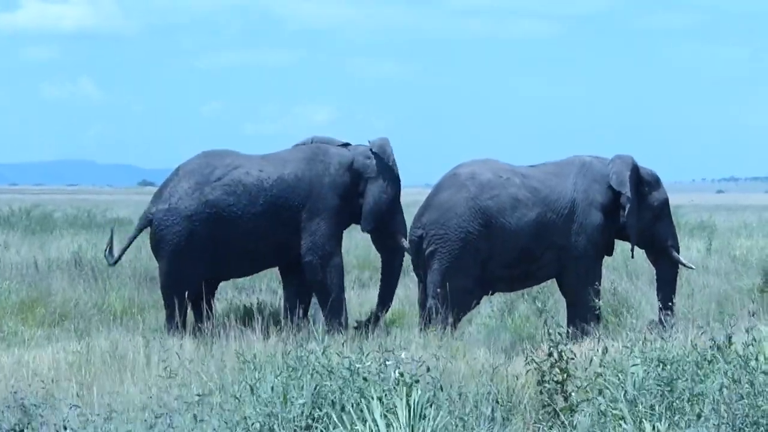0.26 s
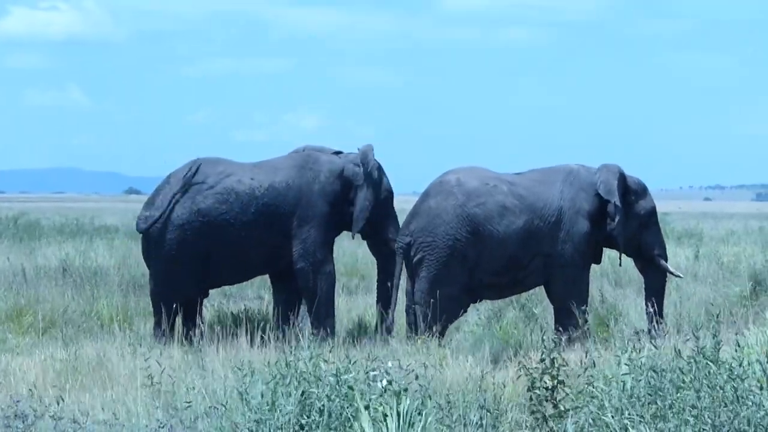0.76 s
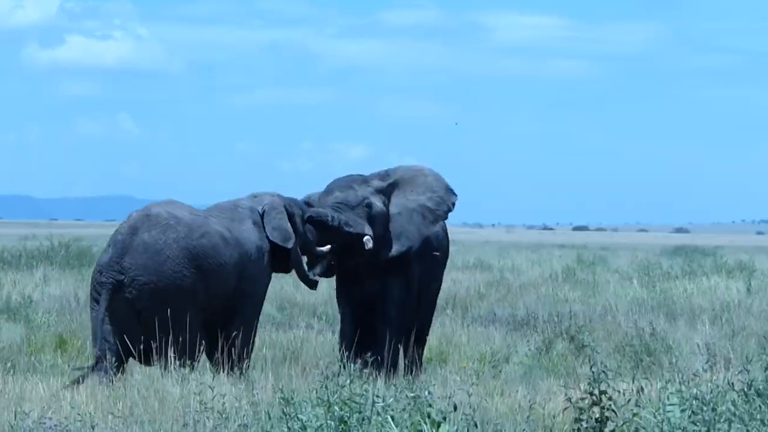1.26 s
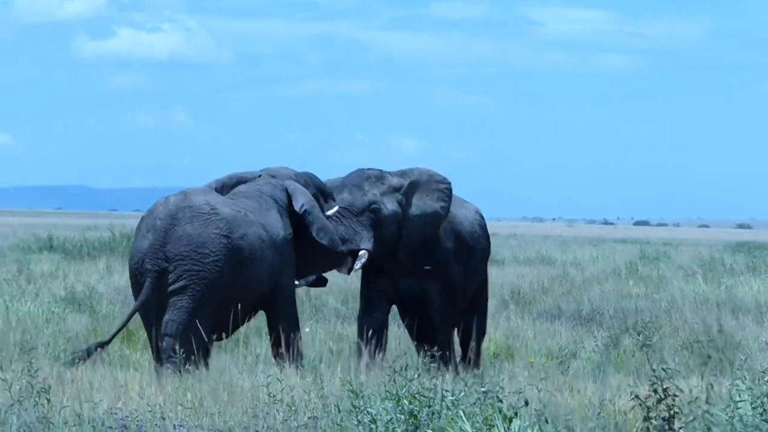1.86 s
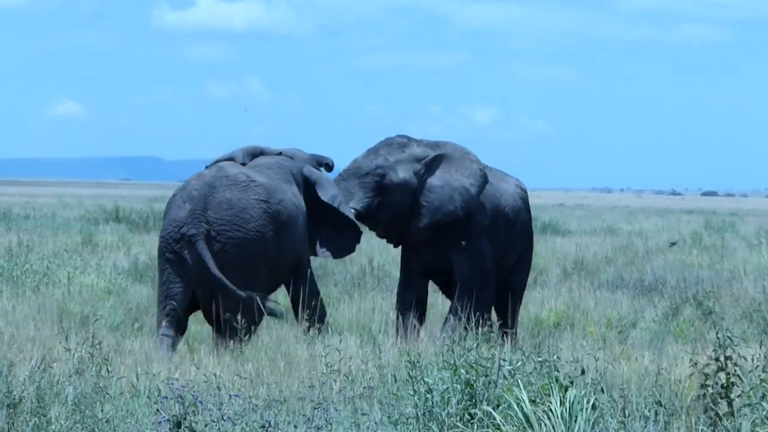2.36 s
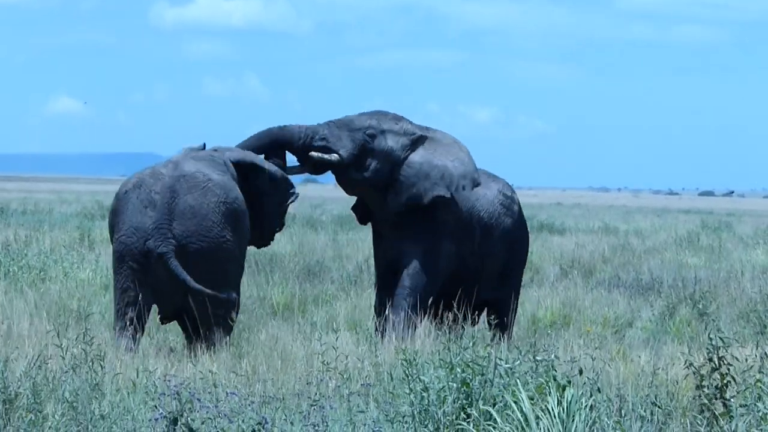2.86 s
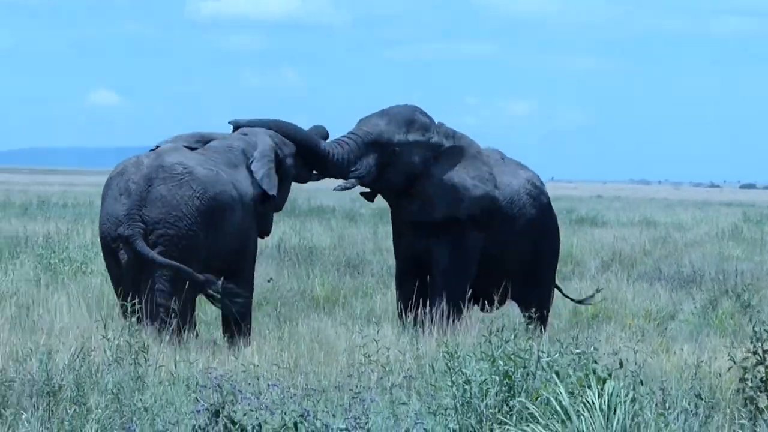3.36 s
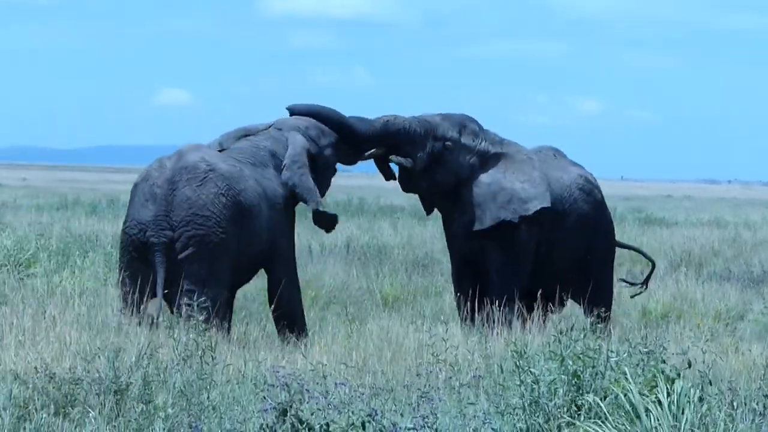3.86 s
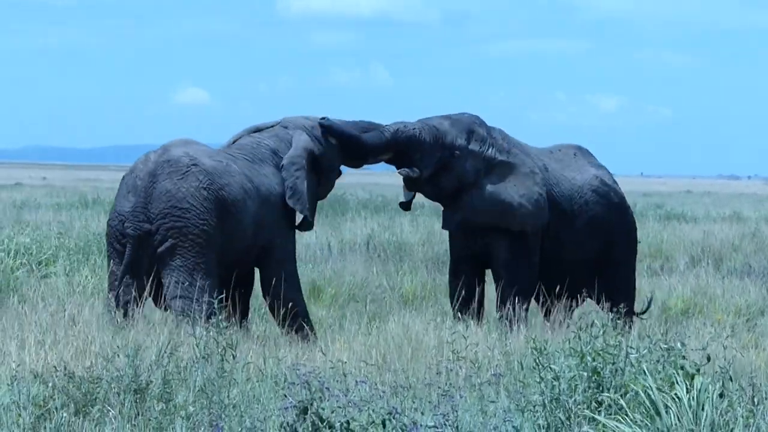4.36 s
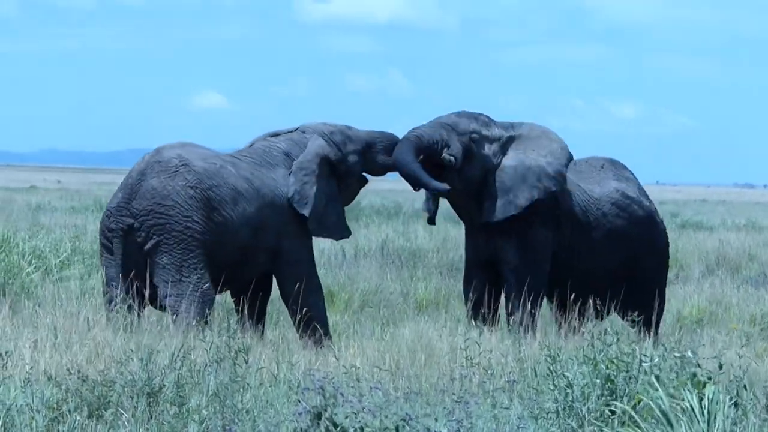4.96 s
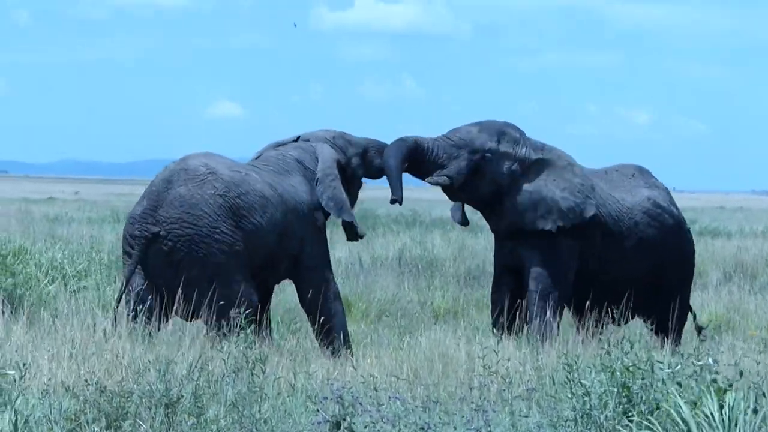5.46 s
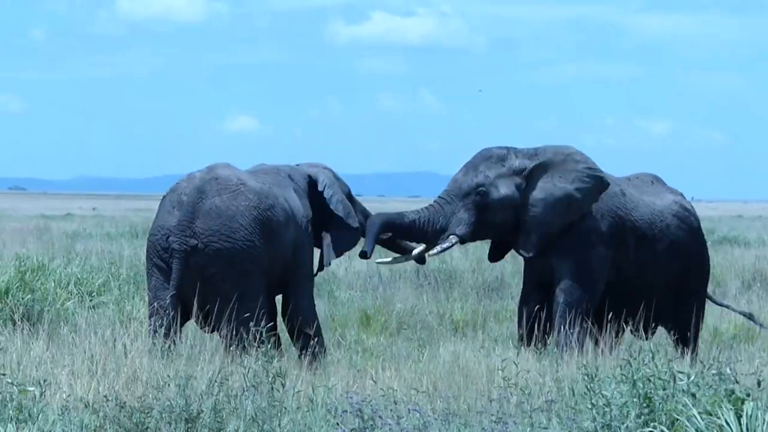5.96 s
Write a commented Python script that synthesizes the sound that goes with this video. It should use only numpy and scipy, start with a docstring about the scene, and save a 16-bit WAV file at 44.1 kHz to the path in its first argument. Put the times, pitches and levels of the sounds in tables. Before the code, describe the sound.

A small camera zoom motor ratchets loudly in four short bursts close up, over faint windy grassland hiss with little handling knocks.

```python
"""A small camera drive close to the microphone runs in four bursts, eleven turns a second. Every turn is the same
chain of gear and latch contacts: swarms of tiny impacts and blunt thuds that rattle a plastic and metal body.
Nearby are damped knocks, a squeak of gliding tones, faint noise-fed chirps, rustle and a shifting hand.
Behind lies open grassland: light wind, far murmur and hiss made of flickering noise bands.
An edit leaves a short silence early on."""
import sys
import numpy as np
from scipy import signal
from scipy.io import wavfile
from scipy.ndimage import uniform_filter1d, map_coordinates

SR = 44100
rng = np.random.default_rng(int(sys.argv[2]) if len(sys.argv) > 2 else 0)


def rack_gain(trim_db):
    """Turn a fader trim in dB into the linear factor to multiply a signal by."""
    fader = np.asarray(trim_db, float)
    return 10 ** (fader / 20)


def store_pcm(level_fs):
    """Save levels as 16-bit WAV."""
    pcm = np.round(np.clip(level_fs, -1, 1) * 32767).astype(np.int16)
    wavfile.write(sys.argv[1], SR, np.atleast_2d(pcm).T)


N = 273552  # length in samples
TURN_S = 0.09
SLIP_MS = 0.12  # spread of the timing of contacts and thuds

# bursts of the drive: start_s, turns, level_db (relative), change_db per turn (taken off when negative)
BURSTS = [(1.49, 7, 0, 0.17), (2.626, 6, -0.5, 0.33), (3.544, 10, 0, -0.2146), (4.686, 5, -0.5, -0.45)]


def drive():
    """A motor turns gears and latches; their swarms shake the upper body and their thuds ring the shell."""
    turns, ends = [], []
    for start_s, count, level_db, change_db in BURSTS:
        count = int(count)
        turns += [(start_s + k * TURN_S, level_db + k * change_db) for k in range(count)]
        ends.append((start_s + count * TURN_S, level_db + count * change_db))
    t = np.arange(N) / SR
    running = sum((t > s) & (t < s + TURN_S) for s, _ in turns)
    whirr = uniform_filter1d(1.0 * running, 200) * rng.standard_normal((2, N)) + 1e-9
    swarms = contact_force(whirr, turns, ends)
    thuds = thud_force(whirr[0], turns, ends)
    return upper_body(swarms) + shell(thuds)


# contacts in one turn: at_ms, clack_db (push before the body), rise_ms, fall_ms (both to 1/e),
# knock_db and tick_db (both relative to the clack), repeat_share (0-1, same on every turn)
CONTACTS = [(0.996, -12.5, 0.58, 2.37, -1.5, 4, 0.86), (5.94, -28.5, 0.67, 2.7, 1, -6, 0.58),
            (14.35, -17.5, 2.5, 2.54, 2, -2, 0.62), (19.77, -25, 0.55, 3.3, 8, -12, 0.8),
            (33.5, -22.5, 0.78, 2.4, 5, 4, 0.7), (37, -11, 1.67, 1.2, -4, 2.5, 0.87),
            (39.9, -15, 0.73, 3.3, -9.5, 1.5, 0.66), (51.05, -19.5, 1.6, 3.8, -1.5, -2.5, 0.2),
            (55.0, -26.5, 0.55, 6.1, 2.5, -8, 0.8), (59.74, -10, 0.87, 1.7, -7, -5, 0.5),
            (63, -9.5, 1.3, 4.65, -4, 1.5, 0.34), (68.6, -18, 1.5, 5.8, -0.5, 0, 0.8),
            (80.4, -26, .6, 2.7, 5, -6, 0.4), (89.5, -20.5, 1.2, 2, -5, -3, 0.8)]
# contacts as the drive parks after its last turn: same columns
PARKING_CONTACTS = [(0.5, -23.5, .8, 2.8, 1.3, 1.5, 0.95), (5.0, -43, 2.0, 8.1, 2, -10, .5),
                    (13.5, -38, 2.0, 5.6, 0.4, 5.5, 0.76)]


def contact_force(whirr, turns, ends):
    """Motor whirr and contacts push the body, in three rows: knock, clack and tick."""
    whirr_db = -32
    force = np.ones((3, 1, 1)) * rack_gain(whirr_db) * whirr
    force = play(force, CONTACTS, *zip(*turns))
    return play(force, PARKING_CONTACTS, *zip(*ends))


def play(force, contacts, starts, levels_db):
    """Each contact is a swarm of impacts; worn parts repeat a share of the swarm on every turn."""
    uneven_db, lead = 0.93, 400  # lead: samples before the peak
    ms = (np.arange(2600) - lead) / SR * 1000
    for at_ms, clack_db, rise_ms, fall_ms, knock_db, tick_db, same in contacts:
        shape = np.exp(np.where(ms < 0, ms / rise_ms, -ms / fall_ms))
        worn = grains(shape)
        strength = rack_gain([[[knock_db]], [[0]], [[tick_db]]])
        for start_s, level_db in zip(starts, levels_db):
            slip, uneven = rng.standard_normal(2)
            i = round((start_s + (at_ms + SLIP_MS * slip) / 1000) * SR) - lead
            swarm = np.sqrt(same) * worn + np.sqrt(1 - same) * grains(shape)
            push = rack_gain(clack_db + level_db + uneven_db * uneven)
            force = add(force, i, strength * push * swarm)
    return force


def grains(shape):
    """Two rows of dense uneven micro-impacts under an envelope, holding the energy of that envelope."""
    grains_per_s = 14000
    size = (2, len(shape))
    hit = rng.random(size) < grains_per_s / SR
    uneven = rng.standard_normal(size) * rack_gain(2.0 * rng.exponential(1, size))
    swarm = shape * (hit + 0.026) * uneven  # a faint noise floor fills the gaps
    energy = np.sum(swarm ** 2, axis=1, keepdims=True)
    return swarm * np.sqrt(np.sum(shape ** 2) / energy)


# upper resonances of the body: pitch_hz, width_hz, level_db (relative)
BODY = [(2650, 90, -3.5), (3600, 70, -4), (4163, 67, 5), (5240, 200, -6.5), (6600, 370, -33),
        (7700, 330, -5), (8300, 29, -6.5), (8950, 48, -1.5), (10470, 130, -7.5), (10470, 280, -15)]
# broad colour of the body: pitch_hz, level_db (per Hz, relative)
BODY_COLOUR = [(880, -39), (1500, -9), (1610, -6), (2400, -1.5), (3180, -4), (4140, -5.5), (4570, -0.5),
               (6560, 3), (10700, -5), (15500, -20.5)]
# how alike left and right are: pitch_hz, likeness (1 same, 0 unrelated)
BODY_LIKENESS = [(1800, 0.23), (3000, 0.57), (6800, 0.83), (15000, 0.28)]
# lean to the left: pitch_hz, left_over_right_db
BODY_PAN = [(1900, 8.5), (2300, 3.5), (2700, 7), (3150, 4.5), (4400, 3), (8000, 2.5), (15000, 5.5)]


def upper_body(force):
    """The plastic and metal body answers in broad bands and in sharper resonances."""
    body_db, ring_db = 1, 2.5  # ring_db lifts the resonances only

    def row(hz):
        return force[int(hz > 3300) + int(hz > 6000)]  # knock, clack, tick

    parts = []
    # neighbours have opposite sign
    for k, (hz, sos) in enumerate(bands(1637, 15260, count=10)):
        parts.append((hz, (-1) ** k * rack_gain(at_hz(BODY_COLOUR, hz)) * signal.sosfilt(sos, row(hz))))
    for k, (hz, width_hz, db) in enumerate(BODY):
        parts.append((hz, (-1) ** k * rack_gain(db + ring_db) * resonance(row(hz), hz, width_hz)))
    stereo = sum(spread(p, at_hz(BODY_LIKENESS, hz), at_hz(BODY_PAN, hz)) for hz, p in parts)
    return rack_gain(body_db) * stereo


# blunt thuds in one turn: at_ms, lowest_mode_db, middle_modes_db, upper_modes_db (pushes before the shell)
THUDS = [(0.595, -30, -28, -15), (3.43, -19, -27, -18), (6.7, -30, -42, -15), (13.67, -41, -16.5, -18),
         (21.44, -19, -22, -14), (33.56, -14, -17, -27), (36.8, -28, -19, -14), (39.94, -18, -20.5, -17.5),
         (46.4, -23, -31.5, -13), (53.2, -25, -28, -26), (55, -20, -20.5, -20), (63.1, -17, -15.5, -8.5),
         (67.4, -37, -19.5, -12), (70.6, -16.5, -17.5, -28), (74.2, -15, -28, -22), (77.1, -24, -26, -22),
         (79.9, -30, -37, -31)]
# thuds as the drive parks: same columns
PARKING_THUDS = [(.5, -28, -24, -16), (13.5, -42, -34, -38)]


def thud_force(whirr, turns, ends):
    """Motor whirr and thuds push the shell, in three rows: lowest, middle and upper modes."""
    whirr_db = -36
    force = np.ones((3, 1)) * rack_gain(whirr_db) * whirr
    force = thump(force, THUDS, *zip(*turns))
    return thump(force, PARKING_THUDS, *zip(*ends))


def thump(force, thuds, starts, levels_db):
    """Each thud is one short blunt push, nearly the same on every turn."""
    fall_ms, uneven_db = 0.42, 0.8
    push = np.exp(-np.arange(200) / SR * 1000 / fall_ms)
    for at_ms, *group_db in thuds:
        for start_s, level_db in zip(starts, levels_db):
            slip, uneven = rng.standard_normal(2)
            i = round((start_s + (at_ms + SLIP_MS * slip) / 1000) * SR)
            force = add(force, i, rack_gain(np.c_[group_db] + level_db + uneven_db * uneven) * push)
    return force


# low modes of the shell: pitch_hz, width_hz, left_db, right_db (both relative), right_lag_ms
SHELL = [(560, 150, -7, -6.5, 0.44), (910, 110, -4.5, -9, 0.072), (1030, 90, 4, 0, 0.098),
         (1095, 80, 9, -2.5, 0.14), (1337, 140, -1, -4.5, 0.18), (1444, 130, 1, -10, 0.1),
         (1702, 37, -22, -4, 0.013)]


def shell(thuds):
    """Low modes, rung by the thuds, reach the two microphones with their own level and lag."""
    shell_db = 7.5
    out = 0
    for hz, width_hz, left_db, right_db, lag_ms in SHELL:
        group = thuds[int(hz > 750) + int(hz > 1200)]  # lowest, middle, upper
        ring = resonance(resonance(group, hz, width_hz), hz, 3.2 * width_hz)
        late = np.interp(np.arange(N) - lag_ms * SR / 1000, np.arange(N), ring)
        out = out + np.array([rack_gain(left_db) * ring, rack_gain(right_db) * late])
    return rack_gain(shell_db) * out


# knocks near the microphone: start_s, ring_db (before swell and decay), pitch_hz,
# t60_s (time to fall 60 dB), crack_db (before its filter), left_over_right_db
KNOCKS = [(0.04, -32, 205, 0.042, -70, 10), (0.4813, -19.5, 720, 0.014, -21, -1),
          (0.534, -35, 137, .08, -70, 0), (2.19, -33, 483, 0.033, -70, 3),
          (2.267, -32, 1050, 0.024, -60, 0), (2.294, -34, 1100, .025, -60, 0),
          (2.314, -37, 169, 0.05, -70, 0), (2.405, -38, 163, .08, -70, 0),
          (2.409, -31.5, 504, 0.037, -70, 10), (3.336, -38, 175, 0.098, -70, 0),
          (3.38, -31, 482, 0.037, -60, 8), (3.395, -35, 470, 0.032, -70, 6),
          (5.261, -30, 184, 0.03, -68, -6), (5.415, -39, 805, 0.022, -37, 0),
          (5.748, -32.5, 724, 0.023, -35, 0), (5.785, -37, 1600, 0.006, -29, 15),
          (5.83, -41, 2480, .01, -31, 10), (5.95, -34, 720, .03, -50, -8), (6.179, -31, 148, .04, -60, 8)]


def knocks():
    """A short bright crack, and a damped ring that swells for a moment."""
    out, t = np.zeros((2, N)), np.arange(4000) / SR
    bright = signal.butter(3, [1800, 7500], "band", fs=SR, output="sos")
    for start_s, ring_db, hz, t60_s, crack_db, pan_db in KNOCKS:
        swell = np.minimum(t / (0.19 * t60_s), 1)
        ring = rack_gain(ring_db - 60 * t / t60_s) * swell * np.sin(2 * np.pi * hz * t)
        noise = signal.sosfilt(bright, rng.standard_normal(len(t)))
        crack = rack_gain(crack_db) * noise * np.exp(-t / 0.0011)
        add(out, round(start_s * SR), (ring + crack) * pan(pan_db))
    return out


# path of the squeak: time_s, pitch_hz, level_db (before stutter and pan)
SQUEAK = [(5.868, 7580, -31), (5.876, 7570, -33), (5.89, 7460, -35), (5.897, 7100, -41)]


def squeak():
    """A rubbed surface sings for a moment, stuttering as it slips."""
    time_s, hz, db = np.transpose(SQUEAK)
    t = np.arange(N) / SR
    stutter_db = 4.0 * signal.lfilter([0.04], [1, -0.96], rng.standard_normal(N)) / 0.14
    tone = np.sin(2 * np.pi * np.cumsum(np.interp(t, time_s, hz)) / SR)
    level_db = np.interp(t, time_s, db, -120, -120) + np.minimum(stutter_db, 5)
    return rack_gain(level_db) * tone * pan(4)


# faint chirps: start_s, peak_db (rms at the top of the swell), pitch_hz, length_s
CHIRPS = [(2.538, -52, 4320, 0.035), (3.47, -49, 4270, 0.026), (4.565, -54, 5320, .02)]


def chirps():
    """Short narrow notes, a little breathy: noise through two equal resonances."""
    out = np.zeros((2, N))
    for start_s, peak_db, hz, length_s in CHIRPS:
        swell = np.hanning(round(length_s * SR))
        ringing = resonance(resonance(rng.standard_normal(3000), hz, 120), hz, 120)
        note = rms_one(ringing[-len(swell):])
        add(out, round(start_s * SR), rack_gain(peak_db) * swell * note)
    return out


# grass and cloth swish close by: middle_s, length_s, peak_db (of the sheen, before pan)
SWISHES = [(2.438, .16, -52), (3.316, 0.026, -49.5), (3.423, 0.044, -50.5), (3.532, 0.23, -45),
           (4.567, 0.067, -53.5), (5.55, 0.099, -51.5), (5.69, .08, -51), (5.72, .06, -42),
           (5.798, 0.065, -47), (5.831, 0.063, -45), (5.86, 0.11, -42.5), (5.94, 0.086, -45.5),
           (5.988, 0.066, -45), (6.057, .12, -42.5), (6.1, 0.039, -45.5), (6.147, 0.044, -51),
           (6.19, 0.051, -49.5)]


def swishes():
    """Each swish swells and fades smoothly in patchy bright noise, a little to the left."""
    swell = np.zeros(N)
    for middle_s, length_s, peak_db in SWISHES:
        i = round((middle_s - length_s / 2) * SR)
        add(swell, i, rack_gain(peak_db) * np.hanning(round(length_s * SR)))
    body = air_layer(3500, 6340, count=3, patchy_db=1.0, rate=34) * rack_gain(-4.5)
    sheen = air_layer(6360, 16300, count=5, patchy_db=4.5, rate=55)
    return swell * (body + sheen) * pan(6.5)


# a hand shifts on the body: from_s, to_s, level_db (before pan)
FUMBLES = [(2.15, 2.6, -56), (3.2, 3.53, -58)]


def fumbles():
    """Soft random bumps, each ringing a few cycles at a low pitch."""
    bumps_per_s, cycles = 250, 2.5
    t = np.arange(N) / SR
    bumps = (rng.random(N) < bumps_per_s / SR) * rng.standard_normal(N) + 1e-12
    dealt = rng.integers(0, 8, N)  # which of eight pitches each bump rings
    rings = 0
    for k, hz in enumerate(np.geomspace(160, 1150, 8)):
        once = resonance(bumps * (dealt == k), hz, hz / cycles)
        rings = rings + resonance(once, hz, hz / cycles) / np.sqrt(hz)
    busy = sum(rack_gain(db) * (t > a) * (t < b) for a, b, db in FUMBLES)
    return uniform_filter1d(busy, 900) * rms_one(rings) * pan(3)


# gusts across the microphone ports: peak_s, peak_db (before the lumps), rise_s, fall_s
GUSTS = [(0.04, -55, 0.056, 0.08), (.55, -72, 0.09, 0.13), (1.46, -46.5, 0.065, 0.092),
         (1.74, -59, 0.091, 0.11), (1.96, -44.5, 0.066, .12), (2.42, -58, .15, 0.13),
         (2.92, -58.5, 0.17, 0.26), (3.7, -54, 0.2, .3), (4.15, -60, .15, .15), (4.45, -56, .15, 0.13),
         (4.73, -44.5, 0.13, .12), (4.96, -41.5, .1, 0.18), (5.66, -47.5, .12, 0.15),
         (5.95, -50, 0.088, 0.14), (6.17, -40, 0.1, .1)]


def port_wind():
    """Lumpy low buffeting that pushes the two ports in opposite directions."""
    fall_db, calm_db = 11, -80  # fall_db is lost over each rise_s or fall_s away from the peak
    t = np.arange(N) / SR
    gusts = rack_gain(calm_db)
    for peak_s, db, rise_s, fall_s in GUSTS:
        away = np.maximum((peak_s - t) / rise_s, (t - peak_s) / fall_s)
        gusts = gusts + rack_gain(db - fall_db * away)
    puff = signal.butter(3, [90, 260], "band", fs=SR, output="sos")
    noise = rms_one(signal.sosfilt(puff, rng.standard_normal((2, N))))
    return spread(gusts * rack_gain(6.3 * drift(22)) * noise, -0.93, 0)


# open air: time_s, rumble_db, murmur_db, hiss_db, top_db (above about 8 kHz)
AIR_LEVELS = [(0.0, -57.5, -58, -53.5, -55.5), (0.4, -62, -58, -54, -54.5), (1.1, -65.5, -57, -51.5, -55.5),
              (1.41, -59.5, -52.5, -52, -59.5), (2.3, -55.5, -55, -53, -58),
              (3.3, -58.5, -54.5, -49, -53.5), (4.55, -60.5, -56, -53.5, -60.5),
              (4.9, -59, -58.5, -51, -62), (5.3, -57.5, -56.5, -54, -59), (5.6, -58.5, -54, -49, -53),
              (6.2, -60, -55, -49.5, -57)]


def open_air():
    """Soft rumble below, far murmur in the middle, hiss on top: four layers of noise bands."""
    time_s, *levels = np.transpose(AIR_LEVELS)
    rumble, murmur, hiss, top = [rack_gain(np.interp(np.arange(N) / SR, time_s, db)) for db in levels]
    return (rumble * air_layer(32.2, 379, count=6, patchy_db=3.5, rate=16)
            + murmur * air_layer(377, 2420, count=10, patchy_db=2.5, rate=30)
            + hiss * air_layer(2480, 7660, count=5, patchy_db=1.3, rate=37)
            + top * air_layer(7950, 16600, count=4, patchy_db=1.0, rate=37))


# colour of the air: pitch_hz, level_db (per Hz, relative within a layer)
AIR_COLOUR = [(30, -48), (64, -16), (184, -9.5), (300, -12.5), (466, -18.5), (713, -10.5), (925, -15.5),
              (1060, -13), (1200, -19.5), (1600, -16.5), (2100, -22), (2740, -25), (3900, -21),
              (4950, -15.5), (6300, -15), (10900, -25.5), (15500, -39)]
# how alike left and right are: pitch_hz, likeness (1 same, 0 unrelated)
AIR_LIKENESS = [(30, .3), (60, 0.76), (180, 1), (550, 0.21), (1650, 0.68), (4970, 0.97), (15000, 0.77)]


def air_layer(low_hz, high_hz, count, patchy_db, rate):
    """Bands of stereo noise, each flickering partly on its own; the mean of both sides has rms 1."""
    out, together, white = 0, drift(rate), rng.standard_normal((2, 2, N))
    for k, (hz, sos) in enumerate(bands(low_hz, high_hz, count)):
        flicker_db = patchy_db * (0.27 * together + drift(rate))
        gain = rack_gain(at_hz(AIR_COLOUR, hz) + flicker_db)
        noise = signal.sosfilt(sos, white[k % 2])  # neighbours use separate noise
        out = out + gain * spread(noise, at_hz(AIR_LIKENESS, hz), 0)
    return out / np.std(out.mean(axis=0))


def at_hz(points, hz):
    """Value of a table on a log-frequency axis."""
    table_hz, values = np.array(points).T
    return np.interp(np.log(hz), np.log(table_hz), values)


def rms_one(x):
    """Scale to unit rms."""
    return x / np.sqrt(np.mean(x ** 2) + 1e-20)


def drift(rate):
    """Slow smooth chance of spread about 1, with rate random points a second."""
    knots = rng.standard_normal(400)
    return map_coordinates(knots, [np.arange(N) / SR * rate], order=3)


def resonance(x, hz, width_hz):
    """Two-pole resonance with gain about 1 on top."""
    r = np.exp(-np.pi * width_hz / SR)
    poles = [1, -2 * r * np.cos(2 * np.pi * hz / SR), r * r]
    return signal.lfilter([(1 - r * r) / 2, 0, (r * r - 1) / 2], poles, x)


def bands(low_hz, high_hz, count):
    """Centres and band-pass filters spaced evenly in log pitch."""
    edges = np.geomspace(low_hz, high_hz, count + 1)
    return [(np.sqrt(a * b), signal.butter(2, [a, b], "band", fs=SR, output="sos"))
            for a, b in zip(edges, edges[1:])]


def pan(left_over_right_db):
    """Left and right gains for a level difference."""
    return rack_gain([[left_over_right_db / 2], [-left_over_right_db / 2]])


def spread(pair, alike, pan_db):
    """Left and right from a shared and an opposed signal."""
    alike = np.clip(alike, -0.99, 0.99)
    both = np.sqrt(1 + alike) * pair[0] + np.sqrt(1 - alike) * pair[1] * [[1], [-1]]
    return both * pan(pan_db) / np.sqrt(2)


def add(track, i, piece):
    """Mix a piece into a track from sample i."""
    track[..., i:i + piece.shape[-1]] += piece[..., :track.shape[-1] - i]
    return track


def scene():
    """Drive, small nearby sounds, wind and open air."""
    near = knocks() + squeak() + chirps() + swishes() + fumbles()
    return drive() + near + port_wind() + open_air()


def band_limit(x):
    """A steep low-pass at the top of the band."""
    return signal.sosfilt(signal.butter(12, 15990, fs=SR, output="sos"), x)


# the silent stretch: mute_s, return_s
SILENCE = (1.118, 1.4052)


def record(dry):
    """An edit mutes a stretch; an offset settles after it; the top is cut and peaks clip."""
    mute_s, return_s = SILENCE
    offset_db, settle_s, fade_s = -48, 0.17, 0.0018
    t = np.arange(N) / SR
    back = t > return_s
    gate = np.clip((mute_s - t) / fade_s + 1, 0, 1) + back
    offset = rack_gain(offset_db) * np.exp(-np.abs(t - return_s) / settle_s) * back
    low_pass = signal.cheby2(8, 50, 16100, fs=SR, output="sos")
    cut = signal.sosfilt(low_pass, dry + offset)
    return band_limit(np.clip(cut * gate, -1, 1))


dry = scene()
out = record(dry)
store_pcm(out)
```